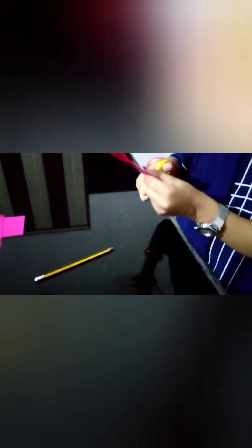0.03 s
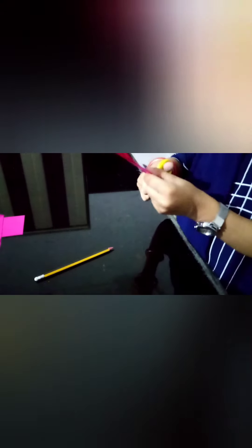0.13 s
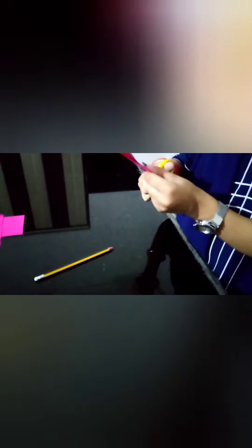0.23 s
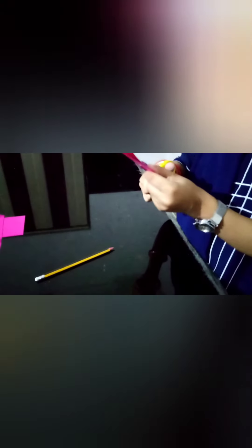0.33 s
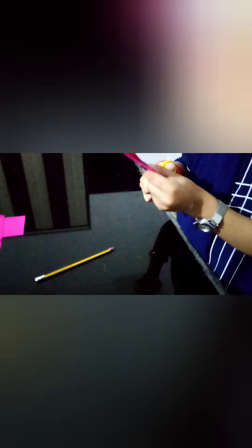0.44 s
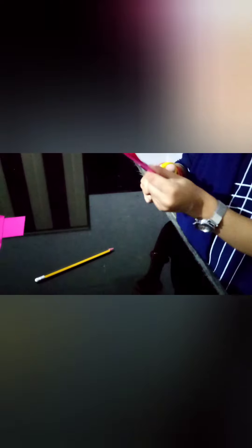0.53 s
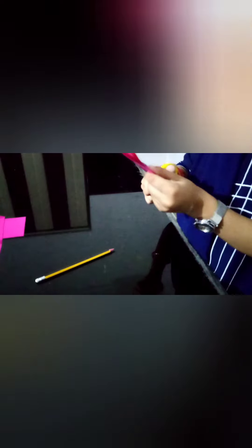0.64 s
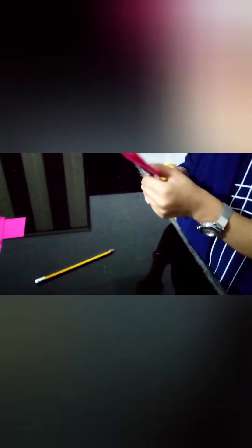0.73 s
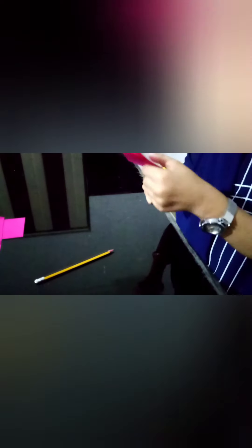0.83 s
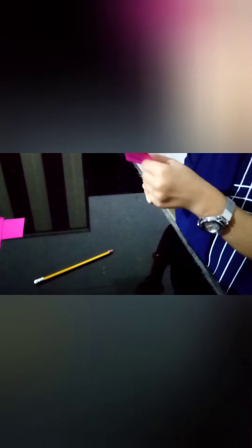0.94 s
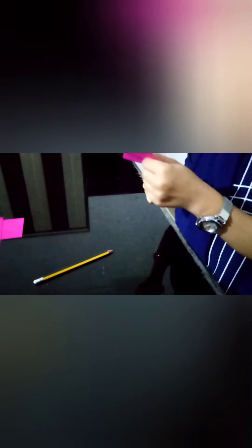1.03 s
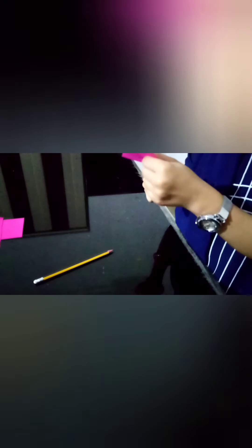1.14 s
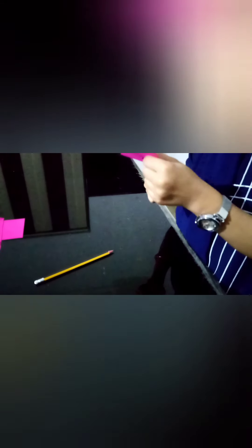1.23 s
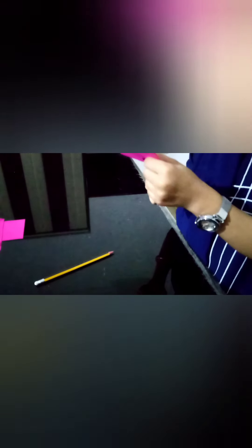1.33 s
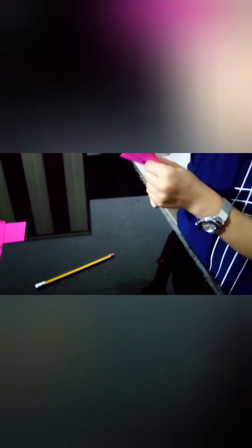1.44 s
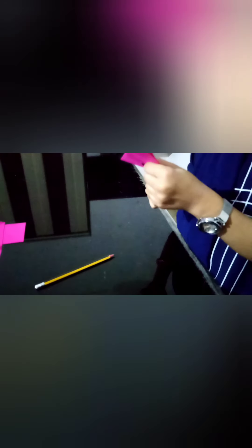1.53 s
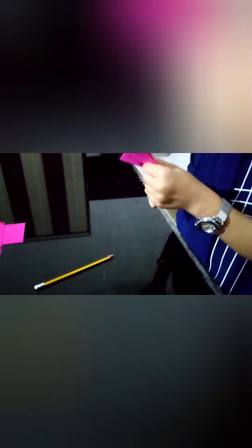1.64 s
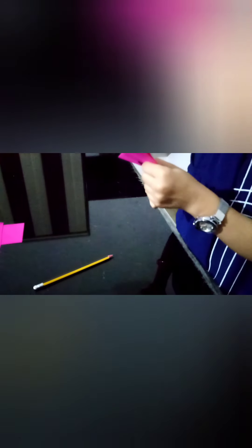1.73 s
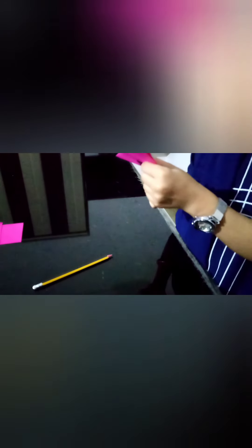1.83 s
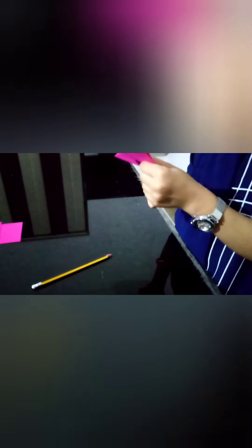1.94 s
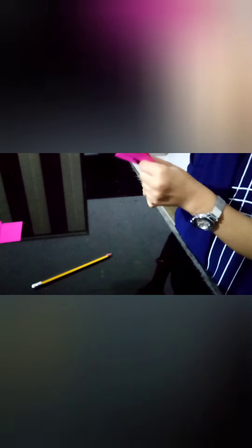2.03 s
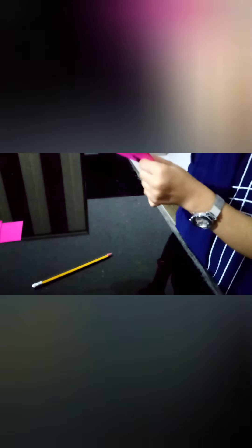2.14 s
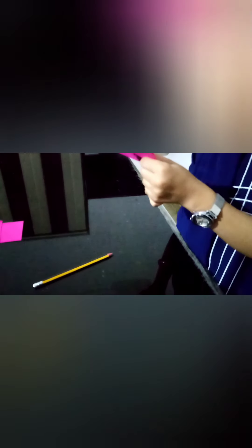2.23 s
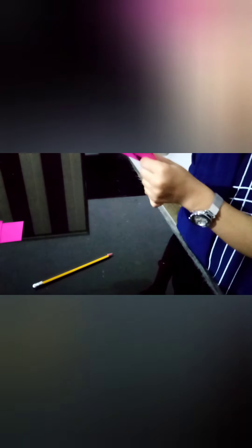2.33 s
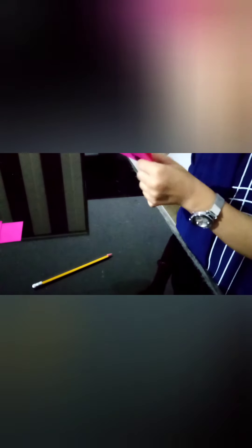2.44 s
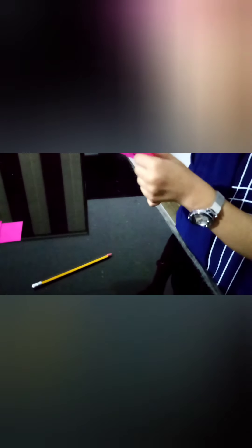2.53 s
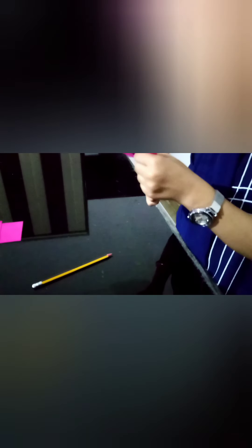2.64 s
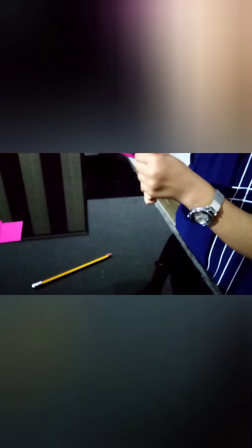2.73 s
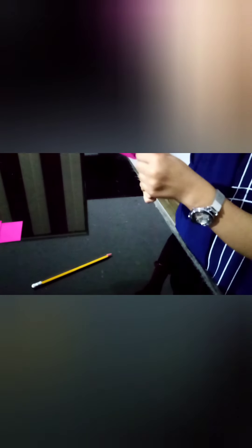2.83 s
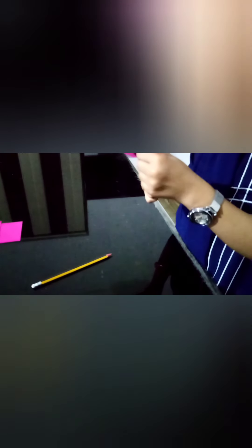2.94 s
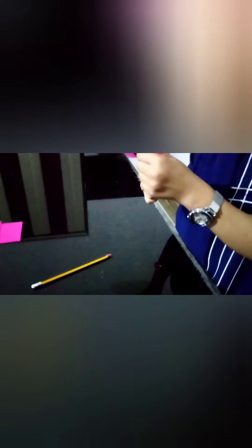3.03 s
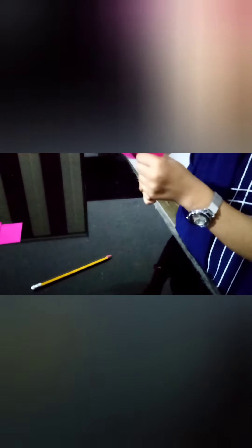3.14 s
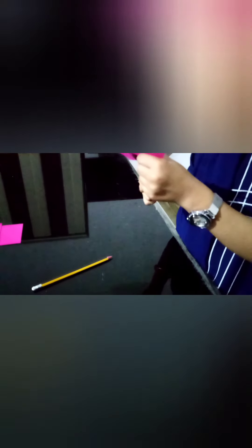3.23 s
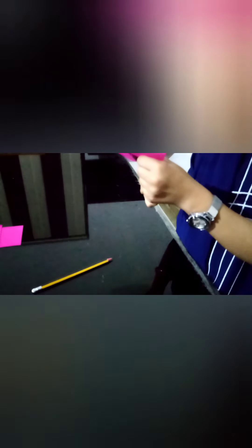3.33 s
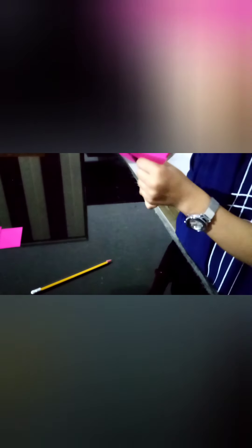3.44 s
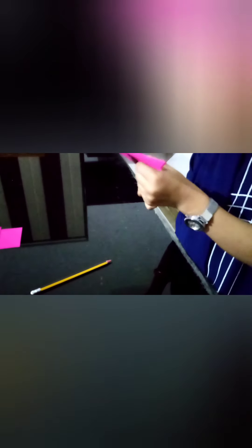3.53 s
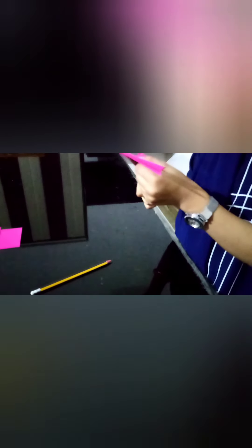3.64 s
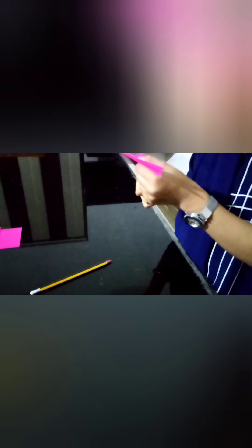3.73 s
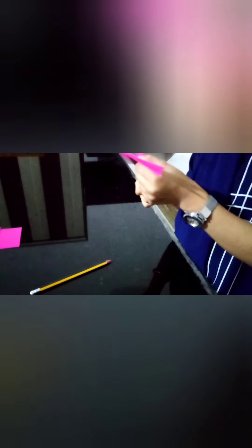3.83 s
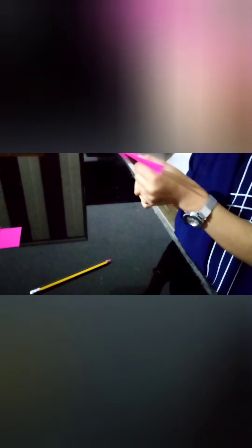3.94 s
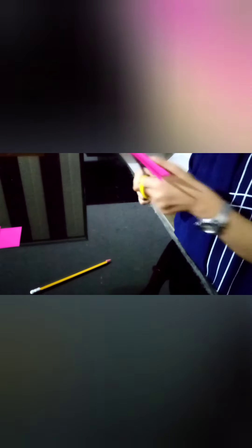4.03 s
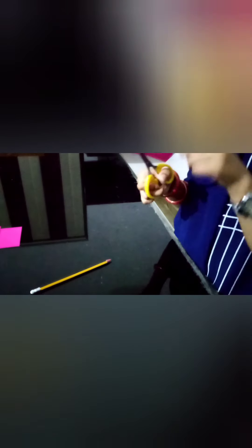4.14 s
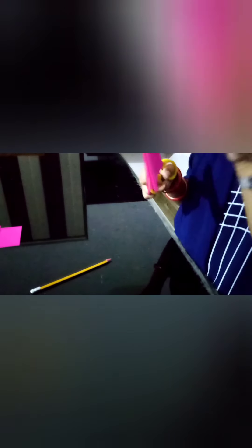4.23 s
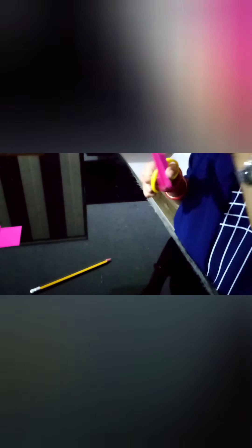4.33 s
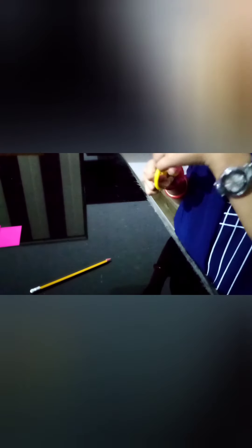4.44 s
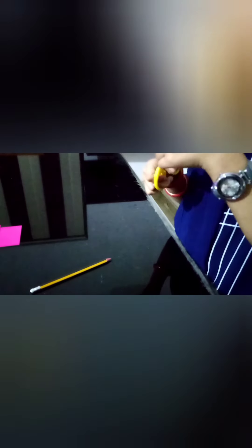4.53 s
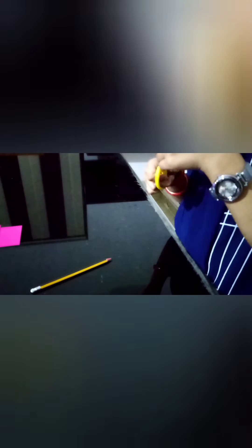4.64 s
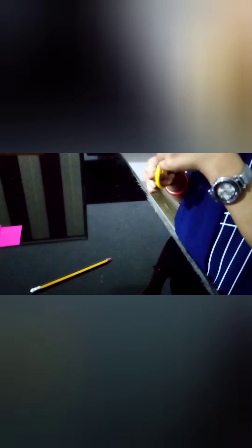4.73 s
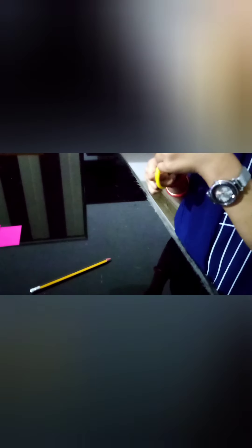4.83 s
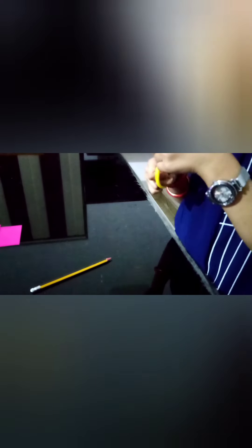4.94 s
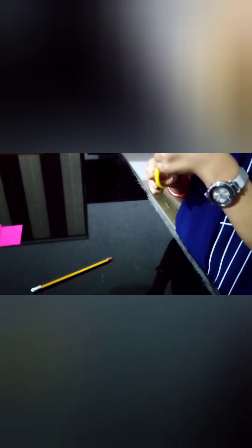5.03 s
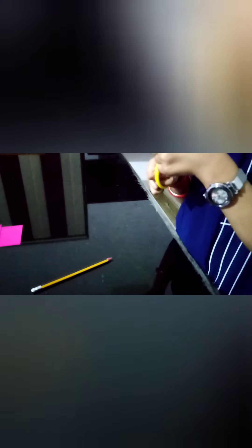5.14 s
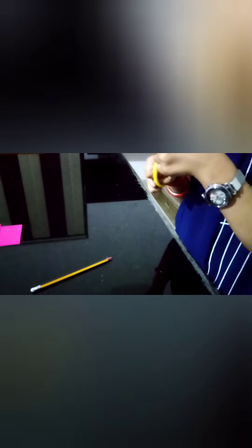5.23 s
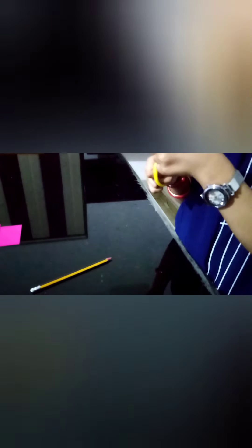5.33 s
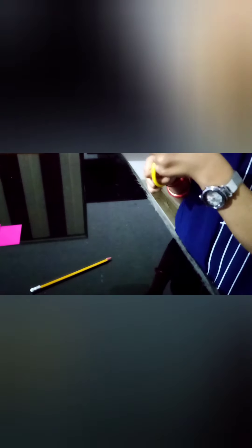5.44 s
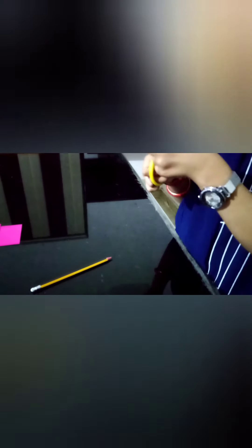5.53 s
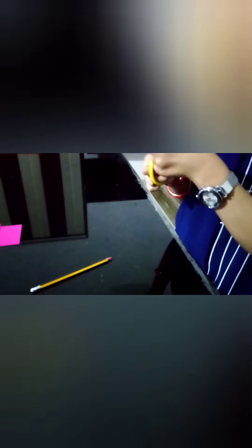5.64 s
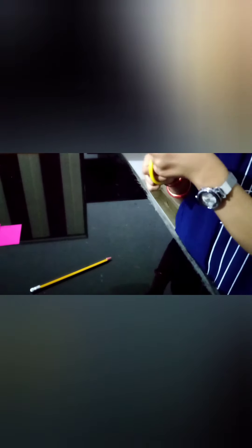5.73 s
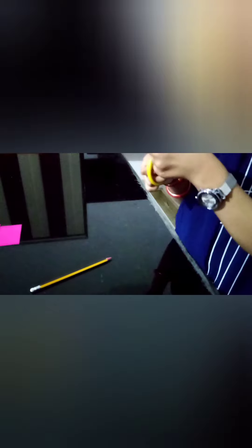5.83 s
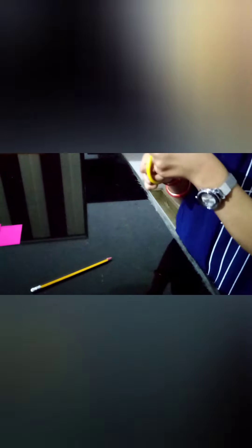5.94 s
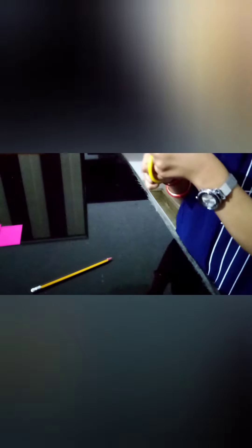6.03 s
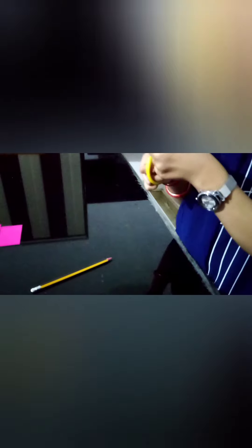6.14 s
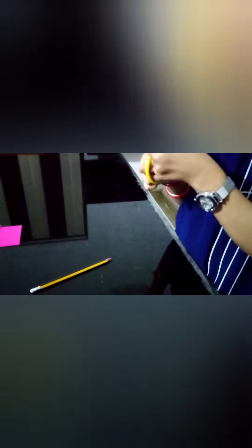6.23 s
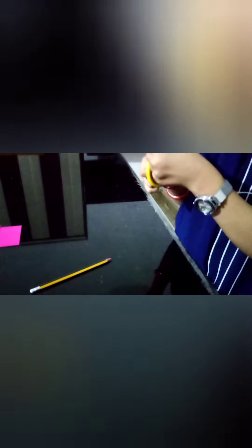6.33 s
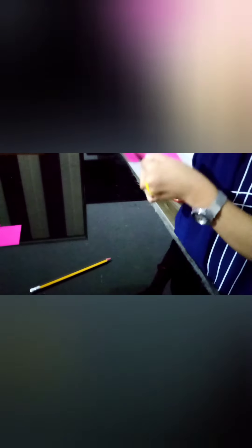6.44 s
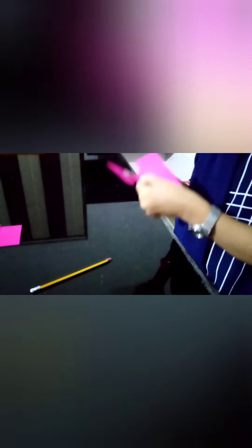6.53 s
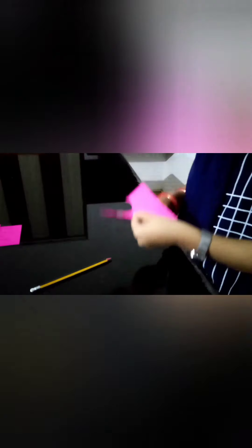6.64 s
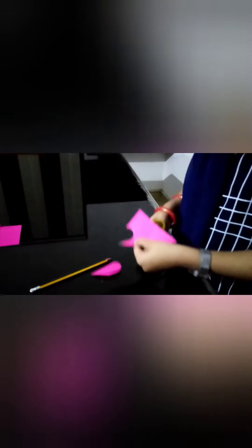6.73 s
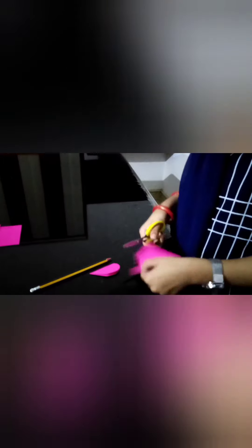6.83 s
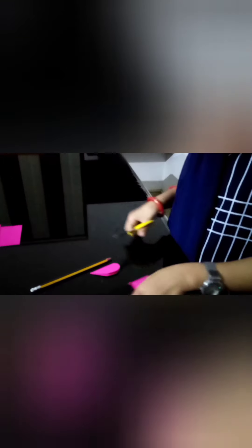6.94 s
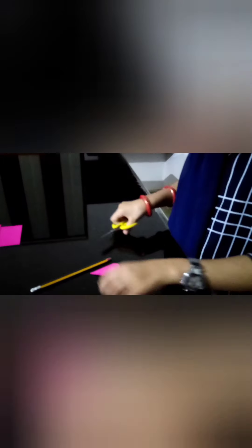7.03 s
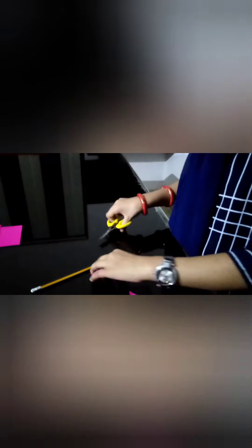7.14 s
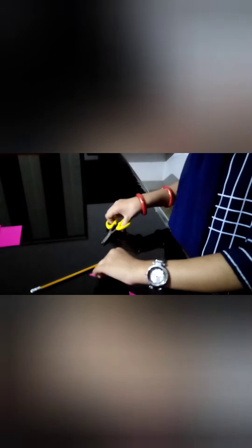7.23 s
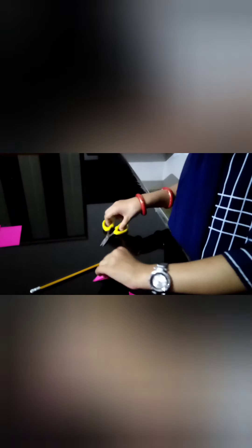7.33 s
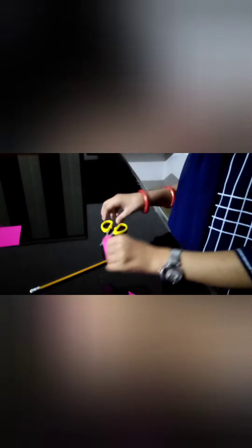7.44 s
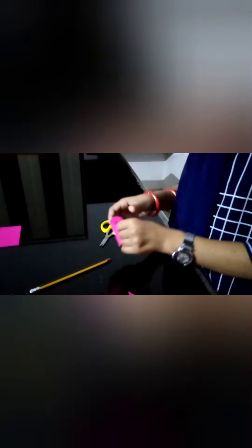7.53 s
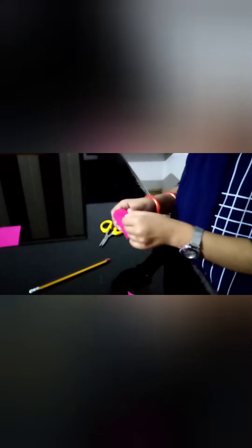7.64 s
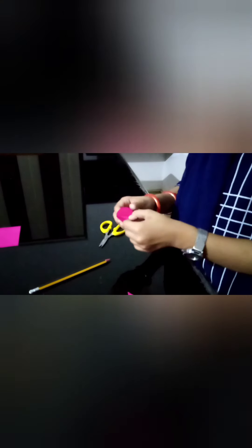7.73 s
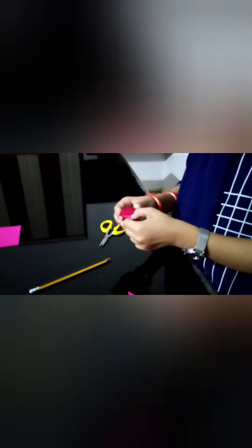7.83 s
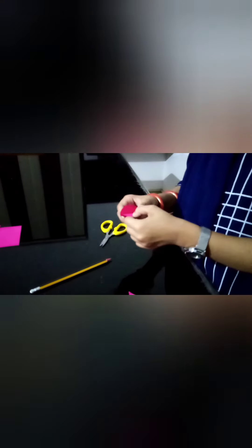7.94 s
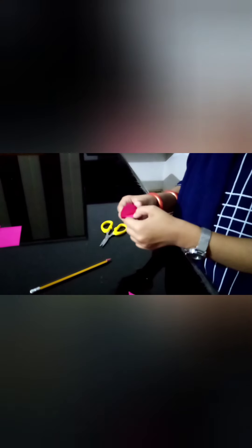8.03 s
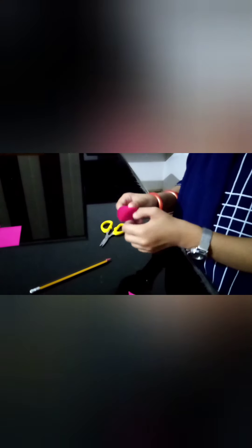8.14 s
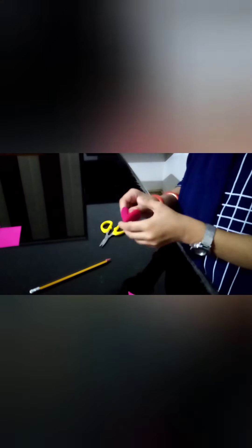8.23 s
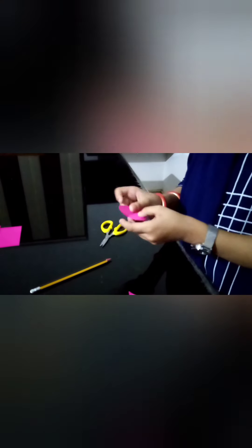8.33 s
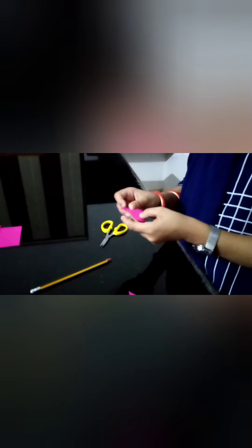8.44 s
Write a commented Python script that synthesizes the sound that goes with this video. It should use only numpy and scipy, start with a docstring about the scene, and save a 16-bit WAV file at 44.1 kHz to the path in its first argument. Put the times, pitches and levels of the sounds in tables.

```python
"""Paper is cut and folded by hand at a table: slipping fibres rustle, and creases and blades snap.
The scissors are dropped, bounce and ring in their modes; these near sounds reverberate off hard walls.
Night insects sing outside, and far off something heavy is beaten at a slow, even pace, with hollow
knocks between. A pair of microphone ports hears it all, the left one first."""
import sys
import numpy as np
from scipy import signal
from scipy.fft import rfft, irfft, next_fast_len
from scipy.io import wavfile
from scipy.ndimage import uniform_filter1d

SR = 44100
rng = np.random.default_rng(int(sys.argv[2]) if len(sys.argv) > 2 else 0)


def to_wav(s):
    """Save 16-bit WAV."""
    ch = np.atleast_2d(s).T  # columns
    pcm = np.round(np.clip(ch, -1, 1) * 32767)  # PCM
    wavfile.write(sys.argv[1], SR, pcm.astype(np.int16))


N = 373527
T = np.arange(N) / SR

# Still air of the room. Each row: frequency in Hz, relative density in dB.
AIR_SPECTRUM = [(12, -24), (20, -22), (43, -5), (116, 5.5), (718, -8), (2020, -10.5), (2460, -13),
                (3250, -6.5), (4810, -18.5), (5850, -5.5), (6910, -12), (8410, -35), (9140, -37),
                (14700, -27.5), (16000, -20)]
# Far insect choirs. Each row: centre in Hz, resonator width in Hz, level in dB.
INSECT_CHOIRS = [(5830, 530, -74.5), (6820, 500, -67)]
# Single insects repeating a phrase. Each row: centre in Hz, resonator width in Hz, level in dB,
# first call, period and hold in seconds, relative level between calls in dB.
INSECT_CALLERS = [(7490, 380, -69.5, 0.26, 0.853, 0.3, -17), (8108, 470, -72.5, 0.17, 0.75, 0.33, -11.5)]
# Insect buzzes. Each row: start and hold in seconds, level in dB, centre and resonator width in Hz.
BUZZ_CALLS = [(0.55, 0.12, -54.5, 3490, 420), (0.695, 0.15, -55.5, 3386, 380),
              (1.656, 0.47, -74, 3090, 480), (2.15, 0.1, -78, 3160, 400), (3.097, 0.092, -77, 3140, 400),
              (3.597, 0.15, -65.5, 3250, 450), (4.228, 0.088, -53, 3480, 350),
              (5.212, 0.16, -56.5, 3470, 350), (6.38, 0.3, -78.5, 3270, 350),
              (7.781, 0.33, -61.5, 3270, 220)]
# Far hollow knocks. Each row: start in seconds, level in dB, pitch in Hz, decay time in seconds.
HOLLOW_KNOCKS = [(0.781, -57, 453, 0.093), (0.965, -76, 410, 0.15), (1.079, -56.5, 495, 0.056),
                 (3.863, -57, 445, 0.1), (4.061, -66.5, 400, 0.17), (6.681, -61, 448, 0.16),
                 (6.821, -57.5, 508, 0.078)]
# Far heavy blows. Each row: start in seconds, levels of slap, boom and second boom in dB.
HEAVY_BLOWS = [(0.232, -52, -49.5, -54.5), (1.892, -49, -52, -54.5), (3.6, -50.5, -51.5, -53.5),
               (5.306, -49, -54.5, -52), (7.011, -49, -51.5, -52.5)]
# Slap of a blow. Each row: frequency in Hz, relative density in dB.
SLAP_SPECTRUM = [(120, -28), (200, -1.5), (312, 1.5), (682, 5.5), (894, -8), (1310, 3), (1770, -8.5),
                 (6240, -8), (6870, -5), (8180, -12.5), (9000, -40), (11700, -66), (19800, -120)]
# Modes of the booming hollow space. Each row: frequency in Hz, level in dB, T60 in seconds.
BOOM_MODES = [(125.2, 5, 0.36), (91.6, -14.5, 1), (144.2, -7, 0.55)]
# Bounces of the scissors. Each row: start in seconds, level in dB, gains of ring, body and thud in dB.
SCISSOR_BOUNCES = [(7.296, -15.5, -3.5, -7, -54), (7.332, -14.5, -36, -1, -48), (7.349, -15, -20, 3, -37.5),
                   (7.374, -24.5, -33, 3, -37)]
# Modes of scissors and table top. Each row: frequency in Hz, relative level in dB, T60 in seconds.
SCISSOR_MODES = [(530, -8.5, 0.67), (1018, -8, 0.32), (1424, -14, .25), (2490, -1.5, 0.33), (3880, -26, .4),
                 (4474, -19, .4), (5728, -3, .3), (6056, -6, 0.33), (6019, 6.5, 0.1), (6390, 9, .15),
                 (6923, -16, .3), (7386, -20, .3)]
# Rattle of loose blades and handles. Each row: frequency in Hz, relative density in dB.
RATTLE_SPECTRUM = [(88, -49), (150, -24), (398, -11), (466, -17), (545, -2.5), (837, -7.5), (1020, -3.5),
                   (3700, -6), (6260, -2), (9630, -20.5), (16000, -30)]
# Snaps of creases and blades. Each row: start in seconds, level in dB, centre in Hz,
# relative body level in dB, T60 in seconds.
CREASE_SNAPS = [(1.8094, -39, 7500, -34, 0.02), (2.193, -47, 6510, -22, 0.023),
                (2.8887, -33.5, 5950, -56, 0.02), (3.0455, -56, 5180, -37, 0.02),
                (3.748, -34, 6240, -34, 0.04), (4.0126, -35.5, 5600, -52, 0.09),
                (4.1615, -16.5, 5150, -26, 0.024), (4.1655, -36, 5150, -34, 0.035),
                (4.8297, -54, 4860, -16, 0.017), (5.084, -45, 3380, -32, 0.055),
                (5.276, -44.5, 3520, -13, 0.033), (5.444, -37, 6330, -25, 0.045),
                (5.81, -39, 5100, -41, 0.018), (5.9496, -53, 7040, -31, 0.026),
                (5.977, -38.5, 6900, -47.5, 0.019), (6.11, -53, 6400, -51, 0.036),
                (6.6439, -27.5, 6060, -30, 0.014), (6.6533, -23, 6100, -53, 0.018),
                (6.6904, -31, 6730, -32, 0.041), (6.702, -18, 7200, -47, 0.016),
                (6.785, -25, 7100, -73, 0.011), (6.7889, -17, 6840, -30, 0.029),
                (6.8352, -24.5, 6260, -25.5, 0.045), (6.953, -28.5, 6850, -64, 0.018),
                (7.1839, -32.5, 6550, -31, 0.014), (7.224, -37.5, 6800, -19, 0.036),
                (7.7099, -26, 4550, -25, 0.016), (8.0199, -33.5, 7050, -31, 0.026),
                (8.1697, -46, 6840, -17, 0.045), (8.4562, -43, 6970, -9, 0.013)]
# Friction noise of the sheet. Each row: frequency in Hz, relative density in dB.
PAPER_SPECTRUM = [(180, -28), (300, -12), (392, -12), (870, -10), (946, -8), (2440, -8.5), (3640, -6),
                  (6200, -2.5), (7820, -3.5), (10400, -32), (16000, -33)]
# Hand strokes on the paper. Each row: start in seconds, level in dB, swell plus hold in seconds,
# gains of flap and crispness in dB, ring of the sheet in Hz.
HAND_STROKES = [(0.213, -51, 0.1, 2.5, -13, 2020), (0.564, -65, 0.19, 3, -16, 3500),
                (1.059, -60.5, 0.091, 6, -28, 1210), (1.503, -54, 0.064, -0.5, -4, 1610),
                (1.795, -51, 0.064, -5, -6, 1010), (1.972, -48, 0.058, -2.5, -2, 1840),
                (2.182, -55.5, 0.03, -1, 4, 1690), (2.616, -60, 0.033, 6.5, -23, 2450),
                (2.873, -50, 0.065, -1, -4, 1770), (3.015, -45.5, 0.056, -0.5, -8, 2500),
                (3.285, -56, 0.073, -1, 4.5, 2220), (3.462, -66.5, 0.011, 7, 8, 2140),
                (3.737, -57, 0.046, -5, 5, 1500), (3.873, -59.5, 0.067, -4, -13, 1090),
                (3.989, -45.5, 0.21, -16, 5, 2020), (4.152, -37, .012, -3, -7, 940),
                (4.217, -59.5, 0.092, -9, -18, 1440), (4.385, -55.5, 0.04, -3, 0, 895),
                (4.523, -51.5, 0.083, -1, -16, 1390), (4.822, -48.5, 0.031, 1.5, -8, 940),
                (5.062, -51, 0.044, -2, 1, 2810), (5.269, -52.5, 0.028, -3.5, -5, 1500),
                (5.426, -43, 0.038, -6, -8, 2740), (5.634, -64, 0.05, -3, 8.5, 1830),
                (5.794, -46.5, 0.041, -4.5, -10, 2260), (5.948, -54, 0.028, -17, -5, 1920),
                (6.103, -48.5, 0.025, 1, -12, 2320), (6.26, -66, 0.65, 1, -12, 1990),
                (6.647, -34, 0.0044, -1.5, -11, 3140), (6.685, -37.5, 0.022, 2, -1, 2040),
                (6.775, -35, 0.01, -21, 6.5, 3000), (6.831, -44, 0.0084, -4, -12, 1020),
                (6.858, -54, 0.061, -4, 0, 970), (6.945, -49.5, 0.0053, -5, 2, 2920),
                (6.981, -48, 0.16, 3.5, -14, 1860), (7.152, -56.5, 0.11, 10, 5, 2420),
                (7.704, -49, 0.0097, -10, -2, 1900), (7.744, -55.5, 0.23, -0.5, -9, 1960),
                (8.012, -68, 0.005, -22, 15, 1920), (8.082, -56.5, 0.098, -5.5, -2, 1973),
                (8.446, -46, 0.041, 2, -21, 1540)]
# Reverberation of the room. Each row: frequency in Hz, T60 in seconds.
ROOM_T60 = [(120, 1), (500, 0.79), (2000, 0.66), (6000, 0.53), (12000, 0.2)]
# Imbalance of the ports. Each row: frequency in Hz, left level over right in dB.
PORT_BALANCE = [(60, 9), (130, 7), (290, 10.5), (640, 12.5), (1410, 9.5), (3100, 7.5), (6820, -0.5),
                (15000, -2)]


def amp(db):
    """Decibels as an amplitude ratio."""
    return 10 ** (np.asarray(db) / 20)


def unit_rms(x):
    """Normalisation to unit mean power."""
    return x / np.sqrt(np.mean(x ** 2) + 1e-20)


def curve_at(points, hz):
    """Interpolation over logarithmic frequency."""
    frequencies, values = np.transpose(points)
    return np.interp(np.log(hz + 1), np.log(frequencies + 1), values)


def add(mix, start, sound):
    """Superposition of a sound on the mix, from start in seconds."""
    part = mix[..., max(round(start * SR), 0):][..., :sound.shape[-1]]
    part += sound[..., :part.shape[-1]]


def coloured(x, spectrum):
    """Filtering by multiplication of spectra."""
    size = next_fast_len(x.shape[-1])
    gain = amp(curve_at(spectrum, np.fft.rfftfreq(size, 1 / SR)))
    return irfft(rfft(x, size) * gain, size)[..., :x.shape[-1]]


def resonate(x, hz, width, stages=1):
    """Resonance by heterodyning: each stage shifts hz down to zero, smooths, and shifts back."""
    carrier = np.exp(2j * np.pi * np.cumsum(hz * np.ones(x.shape[-1])) / SR)
    pole = np.exp(-np.pi * width / SR)
    for _ in range(stages):
        x = 2 * (carrier * signal.lfilter([1 - pole], [1, -pole], x / carrier)).real
    return x


def pair_noise(count, coherence):
    """Partially coherent white noise at two ports."""
    left, independent = rng.standard_normal((count, 2)).T
    return np.array([left, coherence * left + np.sqrt(1 - coherence ** 2) * independent])


def wander(count, span):
    """Slow fluctuation: noise averaged twice over span points."""
    return unit_rms(uniform_filter1d(uniform_filter1d(rng.standard_normal(count), span), span))


def envelope(t, attack, hold, release_db_per_s):
    """Linear rise, hold, then exponential decay."""
    return np.clip(t / attack, 0, 1) * amp(-release_db_per_s * np.maximum(t - attack - hold, 0))


def ring(modes, t):
    """Free vibration as a sum of damped modes."""
    return sum(amp(db - 60 * t / t60) * np.sin(2 * np.pi * hz * t) for hz, db, t60 in modes)


def insect_band(hz, width, db):
    """Random amplitude modulation makes a narrow band of insect song throb."""
    throb_db = 2.6 * wander(N, span=1200)
    band = resonate(pair_noise(N, 0.17), hz, width, stages=3)
    return amp(db + throb_db) * unit_rms(band)


def night():
    """Incoherent addition: blurred insect choirs and two periodic callers sound over still air."""
    out = amp(-71) * unit_rms(coloured(pair_noise(N, 0.15), AIR_SPECTRUM))
    for hz, width, db in INSECT_CHOIRS:
        out += insect_band(hz, width, db)
    for hz, width, db, first, period, hold, rest_db in INSECT_CALLERS:
        phrase = envelope((T - first) % period, 0.054, hold, 250)
        out += (amp(rest_db) + phrase) * insect_band(hz, width, db)
    return out


def insect_buzzes():
    """Stridulation: fast uneven scrapes drive one body resonance; each call fades and sags in pitch."""
    scrape_hz, sag_hz_per_s, fade_db = 185, 170, -3.5
    out, t = np.zeros((2, N)), T[:24000]
    for start, hold, db, hz, width in BUZZ_CALLS:
        scrapes = pair_noise(len(t), 0.64) * (1 + 0.26 * np.cos(2 * np.pi * scrape_hz * t))
        centre = hz - sag_hz_per_s * (t - hold / 2)
        tone = unit_rms(resonate(scrapes, centre, width, stages=2))
        add(out, start, amp(db + fade_db * t / hold) * envelope(t, 0.026, hold, 270) * tone)
    return out


def far_knocks():
    """Resonance of a hollow object: dull bursts excite its pitch and a weaker overtone."""
    out, t = np.zeros((2, N)), T[:12000]
    for start, db, hz, decay in HOLLOW_KNOCKS:
        noise = pair_noise(len(t), 0.32)
        fundamental = unit_rms(resonate(noise, hz, 190, stages=2))
        overtone = unit_rms(resonate(noise, 2.22 * hz, 260))
        shape = np.minimum(t / 0.036, 1) * np.exp(-(t / decay) ** 2)
        add(out, start, amp(db) * (fundamental + 0.46 * overtone) * shape)
    return out


def far_blows():
    """Modal response: after a slap smeared by distance, a hollow space booms unevenly, twice."""
    out, t = np.zeros((2, N)), T[:30000]
    for start, slap_db, boom_db, second_db in HEAVY_BLOWS:
        noise = unit_rms(coloured(pair_noise(len(t), 0.21), SLAP_SPECTRUM))
        slap = noise * amp(-60 * t / 0.5) * np.minimum(t / 0.027, 1)
        uneven = 1 + 0.53 * wander(len(t), span=500)
        boom = ring(BOOM_MODES, t) * np.minimum(t / 0.019, 1) * uneven
        second_boom = ring(BOOM_MODES[:1], t) * np.minimum(t / 0.056, 1) * uneven[::-1]
        add(out, start, amp(slap_db) * slap)
        add(out, start + 0.0239, amp(boom_db) * boom)
        add(out, start + 0.15, amp(second_db) * second_boom)
    return out


def reverberation(x):
    """Diffuse reflection: sparse echoes of random sign, each band decaying at its own rate."""
    echoes = np.zeros((2, SR))
    slots = np.arange(200, SR - 20, 20)
    arrivals = slots + rng.integers(0, 20, (2, len(slots)))
    np.put_along_axis(echoes, arrivals, rng.choice([-1., 1.], arrivals.shape), 1)
    hz, t, bands = signal.stft(echoes, SR, nperseg=256)
    decay = amp(-60 * t / curve_at(ROOM_T60, hz)[:, None])
    tail = signal.istft(bands * decay, SR, nperseg=256)[1]
    return signal.fftconvolve(x, tail / np.linalg.norm(tail[0]), axes=1)[:, :N]


def dropped_scissors():
    """Impact excitation: each bounce cracks, rattles the loose parts, rings and thuds into the table."""
    out, t = np.zeros((2, N)), T[:20000]
    modes = ring(SCISSOR_MODES, t)
    modes /= abs(modes).max()
    crack_and_tail = (amp(-60 * t / 0.0037) + amp(-3.5 - 60 * t / 0.15)) * np.minimum(t / 0.0011, 1)
    for start, db, ring_db, body_db, thud_db in SCISSOR_BOUNCES:
        rattle = coloured(pair_noise(len(t), 0.14), RATTLE_SPECTRUM)
        clatter = unit_rms(coloured(rattle, [(900, body_db), (2200, 0.0069)])) * crack_and_tail
        rumble = resonate(resonate(pair_noise(len(t), 0.99), 112, 87), 120, 87)
        thud = unit_rms(rumble) * envelope(t, 0.0089, 0.013, 230)
        add(out, start, amp(db) * (0.5 * clatter + amp(ring_db) * modes + amp(thud_db) * thud))
    return signal.lfilter(*signal.butter(2, 70, "high", fs=SR), out)


def crease_snaps():
    """Buckling: a crease gives way in a short bright burst over a duller knock of the sheet."""
    out, t = np.zeros((2, N)), T[:3000]
    for start, db, hz, body_db, t60 in CREASE_SNAPS:
        burst = pair_noise(len(t), 0.77) * amp(-60 * t / t60) * np.minimum(t / 0.00032, 1)
        bright = resonate(burst, hz, 2730, stages=2) + 0.027 * np.diff(burst, prepend=0)
        body = resonate(resonate(burst, 940, 1400), 770, 1300)
        add(out, start, amp(db) * (bright / abs(bright).max() + amp(body_db) * body / abs(body).max()))
    return signal.lfilter(*signal.butter(2, 400, "high", fs=SR), out)


def paper_rustle():
    """Stick-slip friction: fibres slip in clumps, the sheet flaps and rings, dry creases add hiss."""
    grains_per_s, swell_share = 600, 0.36
    ring_db, ring_width_hz, under_ring_db, patchy_db = 6, 132, -11.5, 4.5
    grains = amp(7.1 * np.minimum(rng.exponential(1, N), 3.5)) * (rng.random(N) < grains_per_s / SR)
    clumps = unit_rms(signal.lfilter([1], [1, -0.985], grains))
    friction = unit_rms(coloured(pair_noise(N, 0.067) * (0.99 + clumps), PAPER_SPECTRUM))
    out, t = np.zeros((2, N)), T[:24000]
    hz = np.fft.rfftfreq(len(t), 1 / SR)
    flap_band = 1 / (1 + (hz / 2800) ** 6)
    hiss_band = 1 / (1 + (8800 / (hz + 1)) ** 12)
    for start, db, length, flap_db, crisp_db, ring_hz in HAND_STROKES:
        peak = 1 / (1 + (2 * (hz - ring_hz) / ring_width_hz) ** 2)
        under_ring = 1 / (1 + (1.35 * hz / ring_hz) ** 8)
        patches = wander(len(hz), span=60)
        colour = amp(flap_db * flap_band + ring_db * peak + under_ring_db * under_ring + patchy_db * patches)
        slips = rfft(friction[:, round(start * SR):][:, :len(t)], len(t)) * colour
        body = irfft(slips * (1 - hiss_band), len(t))
        hiss = irfft(slips * hiss_band, len(t))
        # Long strokes swell more slowly; all taper as they go.
        grip = envelope(t, 0.0013 + swell_share * length, (1 - swell_share) * length, 334)
        shape = grip ** 1.2 * amp(-52.5 * t)
        add(out, start, amp(db) * (shape * body + amp(crisp_db) * shape ** 0.6 * hiss))
    return out


def scene():
    """Superposition: near sounds with their reverberation, far sounds without."""
    scissors, creases, paper = dropped_scissors(), crease_snaps(), paper_rustle()
    room = reverberation(amp(-5.5) * scissors + amp(-10.5) * creases + amp(-13.5) * paper)
    near = scissors + creases + paper + room
    return near + far_blows() + far_knocks() + insect_buzzes() + night()


def record(dry):
    """Level and time differences: the ports differ in colour, the right lags, both are band-limited."""
    lag_samples, cutoff_hz = 43, 15900
    left = coloured(dry[0], [(hz, db / 2) for hz, db in PORT_BALANCE])
    right = coloured(dry[1], [(hz, -db / 2) for hz, db in PORT_BALANCE])
    ports = np.array([left, np.pad(right, (lag_samples, 0), "reflect")[:N]])
    low_pass = signal.firwin(511, cutoff_hz, window=("kaiser", 9), fs=SR)
    return signal.oaconvolve(ports, low_pass[None], "same")


dry = scene()
out = record(dry)
to_wav(out)
```